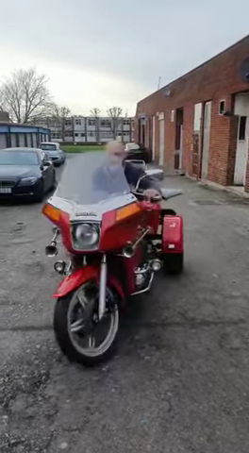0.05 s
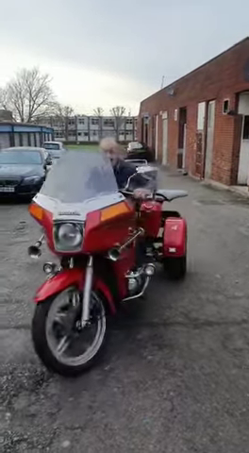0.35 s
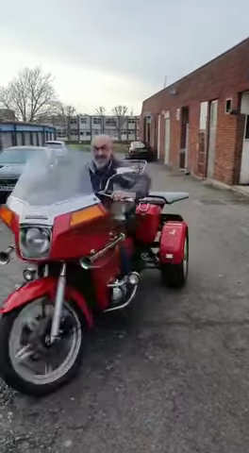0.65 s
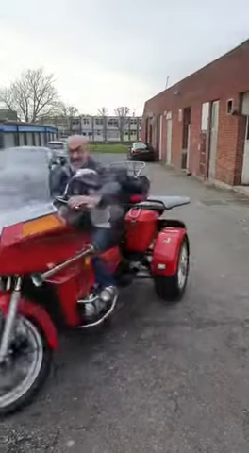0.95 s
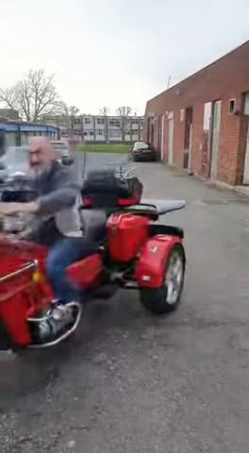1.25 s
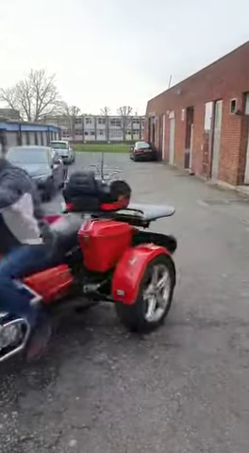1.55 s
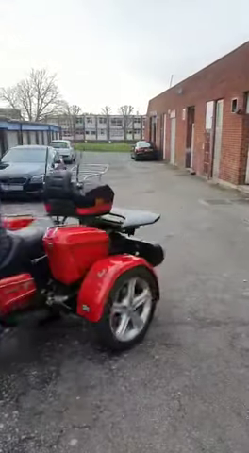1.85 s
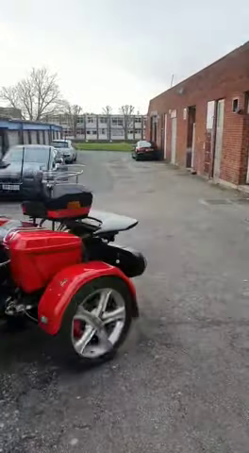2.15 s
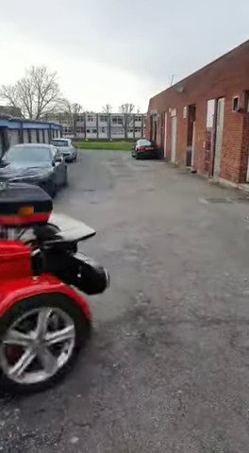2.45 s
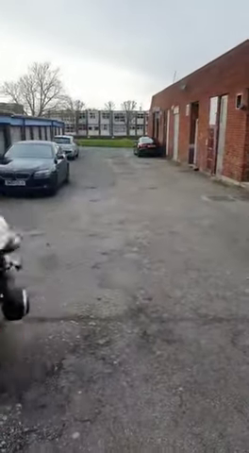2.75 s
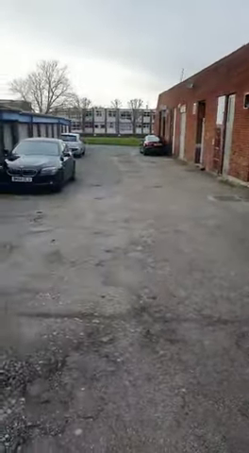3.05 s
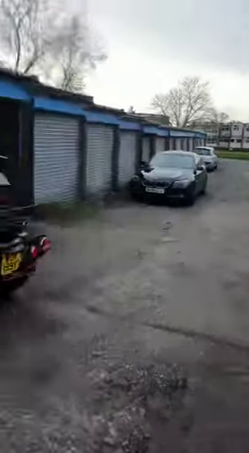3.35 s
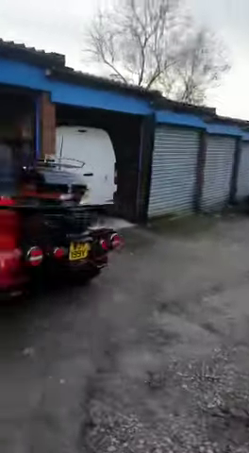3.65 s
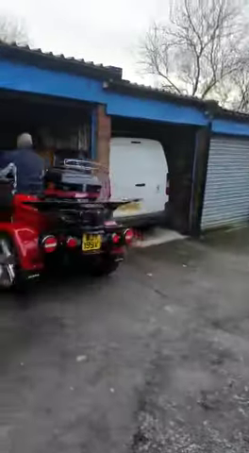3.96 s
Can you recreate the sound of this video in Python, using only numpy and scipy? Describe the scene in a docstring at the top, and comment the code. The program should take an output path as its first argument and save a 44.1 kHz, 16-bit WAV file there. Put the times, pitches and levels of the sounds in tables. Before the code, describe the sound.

A motor trike's engine rumbles close by from the start, with exhaust thump, light hiss and valve ticking. It eases off as the horn toots briefly at about 0.65 seconds and slightly longer at 1.3, echoing off the yard's walls. After two small ticks, the engine pulls again near 1.9 seconds, drops to a loping idle around 3 and rises slightly near 4. Grit crackles faintly under the tyres.

```python
"""A motor trike's four-cylinder engine, close to a stereo microphone in an asphalt yard with brick walls.
Rolling past, it pulls, eases off while the horn toots twice, pulls again and drops to a loping idle.
Each firing thumps through the exhaust and spits a puff of hiss as the valves tick. The horn is a
diaphragm buzzing into a flare. Grit crackles under the tyres; the walls echo over faint outdoor air."""
import sys
import numpy as np
from scipy import signal
from scipy.fft import rfft, irfft
from scipy.io import wavfile
from scipy.ndimage import uniform_filter1d

SR = 44100
rng = np.random.default_rng(int(sys.argv[2]) if len(sys.argv) > 2 else 0)


def output_pcm(signal):
    """Save a mono or channel-first signal as 16-bit PCM at the path in sys.argv[1].

    Samples are clipped to [-1, 1] before scaling.
    """
    pcm = np.clip(np.atleast_2d(signal).T, -1, 1) * 32767
    wavfile.write(sys.argv[1], SR, np.round(pcm).astype(np.int16))


N = 176400
T = np.arange(N) / SR

# Engine speed. Each row: time in seconds, firings per second.
SPEED = [(0, 90.6), (.17, 92.4), (.3, 73), (.6, 72), (.72, 82), (.8, 75), (.98, 58.6), (1.45, 54.2),
         (1.98, 52), (2.09, 66.9), (2.33, 66.5), (2.53, 62.3), (2.75, 64.6), (2.84, 54), (2.92, 47),
         (3.0, 42), (3.09, 27.5), (3.15, 26), (3.28, 27.8), (3.62, 27.7), (3.82, 36), (4, 44)]
# The engine's treble at the microphone. Each row: time in seconds, clatter in dB, hiss in dB.
TREBLE = [(0, -36, -46.5), (.3, -38, -45), (.62, -36.5, -40.5), (.8, -40, -54.5), (1.0, -48.5, -46.5),
          (1.28, -42.5, -47), (1.55, -46, -50), (1.85, -62, -53.5), (1.87, -35, -39.5), (2.0, -35.5, -37.5),
          (2.3, -39.5, -40), (2.8, -39, -42.5), (3.0, -41, -47), (3.2, -42, -51), (3.36, -41.5, -48.5),
          (3.6, -42.5, -50), (4, -41.5, -47.5)]
IDLE_HZ, PULL_HZ = 27.1, 62.5   # firing rates
HISS_LIKENESS = 0.0509   # left and right are nearly unrelated


def crank():
    """The turning crank, as a running count of firings; the first cylinder fires at zero."""
    count = np.cumsum(curve(SPEED)) / SR
    zero_s = 3.334
    return count - np.interp(zero_s, T, count)


def firings():
    """Two strong cylinders fire, then two weak: impulses for the thumps, hiss puffs and valve ticks."""
    # Cylinders in firing order. Each row: relative thump in dB, its delay in seconds, relative hiss in dB.
    cylinders = [(1.5, 0, 10.5), (0.16, .0007, 6.5), (-1.5, .0003, 1.5), (-2, -.0006, 2.5)]
    count = crank()
    index = np.arange(np.ceil(count[0]), count[-1]).astype(int)
    times = np.interp(index, count, T)
    thump_db, delay, hiss_db = np.array(cylinders)[index % len(cylinders)].T
    rate = np.interp(times, T, curve(SPEED))
    lope = np.interp(rate, [IDLE_HZ, PULL_HZ], [2.02, 1])   # firings are more uneven at idle
    late, loud, spit, snap = rng.standard_normal((1024, 4))[index].T
    jitter_s = .00016 * lope ** 2 * late
    thumps = clicks(times + delay + jitter_s, from_db(lope * (thump_db + loud)))
    spits = clicks(times, from_db(np.sqrt(lope) * hiss_db + 1.8 * spit))
    taps = clicks(times, from_db(hiss_db + 3 * snap) / lope ** 2)
    return thumps, spits, taps


def exhaust(thumps):
    """Firings ring the pipes; turbulent puffs roughen the bark, most of all at idle."""
    # Pipe resonances in three ranges. Each row: frequency in Hz, width in Hz, relative gain in dB.
    bass_modes = [(63.8, 34.7, 1.5), (95.9, 24, 7.5), (121.7, 29.3, -4.5)]
    middle_modes = [(159.9, 18, -3.5), (180.2, 28.3, -2.5), (202, 29, -0.5), (242, 43.3, -9.5)]
    bark_modes = [(300, 46.5, -3.5), (396, 62.4, 2), (454.5, 81.5, 0.5), (503.2, 49.4, 0),
                  (573.6, 52, -6.5)]
    # The same ranges at the microphone. Each row: time in seconds, level in dB.
    bass_levels = [(0, -14.5), (.17, -14.5), (.3, -15), (.6, -16.5), (.67, -21.5), (.8, -21.5),
                   (.98, -22.5), (1.45, -25.5), (1.619, -29), (1.86, -30.5), (2.0, -21), (2.5, -22.5),
                   (2.8, -17.5), (2.97, -22), (3.099, -19), (3.135, -27), (3.2, -21), (3.4, -19),
                   (3.65, -20), (4, -17)]
    middle_levels = [(0, -14), (.16, -16), (.3, -28), (.62, -21), (.75, -34.5), (1.3, -31), (1.8, -44.5),
                     (2.019, -23.5), (2.5, -27.5), (2.8, -25), (3.2, -37), (3.7, -38), (4, -23.5)]
    bark_levels = [(0, -27.5), (.62, -26.5), (0.899, -38.5), (1.299, -36), (1.84, -54), (1.88, -36),
                   (2.05, -29.5), (2.5, -30.5), (2.649, -26), (2.8, -22.5), (2.88, -31.5), (3.15, -40.5),
                   (3.7, -40.5), (4, -34.5)]
    roughness = np.interp(curve(SPEED), [IDLE_HZ, PULL_HZ], [2.5, 1])
    puffs = run_in(roughness * rms_one(die_away(thumps, seconds=0.034) * rng.standard_normal(N)))
    beats = run_in(rms_one(thumps))
    bass = butter(butter(pipe(beats + 0.25 * puffs, bass_modes), 28.0, "high"), 165, "low")
    middle = butter(pipe(beats + 0.59 * puffs, middle_modes), [130, 300], "band")
    bark = butter(pipe(beats + 0.8 * puffs, bark_modes), [270, 640], "band")
    bass = even(bass[-N:]) * from_db(curve(bass_levels))
    middle = even(middle[-N:]) * from_db(curve(middle_levels))
    bark = even(bark[-N:]) * from_db(curve(bark_levels))
    return bass + (middle + bark) * from_db([[-.5], [.5]])   # a touch to the right


def engine_hum():
    """At times single engine orders stand out as a hum, pulling or easing off."""
    # Hum tones. Each row: start and end in seconds, multiple of the firing rate, level in dB.
    tones = [(-.1, 0.21, 2.25, -24), (0.298, 0.63, 2, -23.5), (0.99, 1.476, 2, -25), (1.01, 1.3, 3, -32.5),
             (1.5, 1.96, 2, -43), (1.962, 2.056, 2, -24), (2.03, 2.808, 3, -34), (2.09, 2.837, 6.25, -36),
             (2.844, 3.04, 1, -22), (3.79, 4.099, 1, -26.5)]
    count, out, fade_s = crank(), 0, 0.061
    for start, end, multiple, db in tones:
        gate = np.clip(np.minimum(T - start, end - T) / fade_s + .5, 0, 1)
        out = out + from_db(db) * gate * np.sqrt(2) * np.cos(2 * np.pi * multiple * count)
    return out


def clatter_and_hiss(spits):
    """Mechanical noise and gas hiss swell from a steady floor with each firing."""
    # Colours of the two noises. Each row: frequency in Hz, relative level in dB.
    clatter_spectrum = [(380, -24), (650, -3.5), (711, -4.5), (1030, -4.5), (1150, -11.5), (2510, -11),
                        (3470, -17), (4500, -20), (5850, -21.5), (9900, -120)]
    hiss_spectrum = [(2060, -23), (3500, -19.5), (4140, 0.5), (5280, -7), (6170, 3), (8110, -8.5),
                     (11400, -4.5), (15000, -9)]
    puff_s, swell_s = 0.014, 0.01
    puff = rms_one(die_away(die_away(spits, puff_s), swell_s))
    clatter = even(0.55 + 0.48 * puff) * noise(clatter_spectrum, likeness=0.21)
    hiss = 0.93 * even(0.3 + 0.88 * puff) * noise(hiss_spectrum, HISS_LIKENESS)
    return clatter * from_db(curve(TREBLE)) + hiss * from_db(curve(TREBLE, column=2))


def valves(taps):
    """The valve gear gives one short, bright tick with each firing, following the level of the hiss."""
    # Colour of a tick. Each row: frequency in Hz, relative level in dB.
    tick_spectrum = [(2500, -26), (6200, 1.5), (8300, -12.5), (11500, -3), (15000, -6)]
    ticks = die_away(taps, seconds=0.0021) * noise(tick_spectrum, HISS_LIKENESS)
    return from_db(2 + curve(TREBLE, column=2)) * ticks


def horn():
    """A buzzing diaphragm starts sharp and settles; upper partials flutter, the flare holds the lowest."""
    # Toots. Each row: start and length in seconds, gain in dB, starting and settled pitch in Hz,
    # settling time in seconds, leftward pan in dB, left lag in seconds, the fundamental's rise
    # and ring in seconds, relative rasp in dB.
    toots = [(.648, 0.072, -11, 319.3, 306, 0.0538, 0, .00005, 0.053, 0.03, -13),
             (1.284, 0.162, -12, 321.3, 304.4, 0.0153, 0.5, -.0002, 0.014, 0.0056, -23.5)]
    # Harmonics, lowest first. Each row: relative dB head-on (first toot) and side-on (second toot).
    partials = [(9.5, 5.5), (5.5, 4.5), (-4.5, 0), (-9, -8.5), (-3.5, -2.5), (-10, -2.5), (-8.5, -2.5),
                (-12, -15), (-15, -15.5), (-9.5, -15), (-20.5, -17), (-22.5, -24)]
    # Drop in dB for each harmonic beyond those: head-on, side-on.
    fall_db = [1.26, 1.5]
    # Flare resonances that colour the rasp. Each row: frequency in Hz, width in Hz, relative gain in dB.
    flare_modes = [(950, 31, 10), (1600, 210, -5.5), (2350, 420, 1)]
    # Balance at the microphone. Each row: frequency in Hz, left minus right in dB.
    balance = [(300, -2), (600, 1.5), (900, -3), (1600, -7.5), (2200, -11), (2800, -0.5), (7000, -13.5)]
    attack_s, treble_lag_s, rasp_attack_s, release_s = 0.0041, 0.00095, 0.014, 0.011
    jitter, dispersion, flutter_hz = 0.0039, .23, 54
    multiples = np.arange(1, 24)
    listed = np.minimum(multiples, len(partials))
    out, left_right = np.zeros((2, N)), np.array([[.5], [-.5]])
    for i, toot in enumerate(toots):
        start, length, db, start_hz, end_hz, settle_s, pan_db, lag_s, bass_rise_s, ring_s, rasp_db = toot
        on = (T >= start) & (T < start + length + .2)
        age = T[on] - start
        after = np.maximum(age - length, 0)
        waver = rms_one(butter(rng.standard_normal(N), 120, "low"))[on]
        rasp = rms_one(butter(pipe(rng.standard_normal((2, N)), flare_modes), 3760, "low"))[:, on]
        hz = end_hz + (start_hz - end_hz) * np.exp(-(age / settle_s) ** 2 / 2)
        phase = 2 * np.pi * np.cumsum(hz * (1 + jitter * waver)) / SR
        flutters = rms_one(butter(rng.standard_normal((len(multiples), SR)), flutter_hz, "low"))
        gains = from_db(np.array(partials)[listed - 1, i] - fall_db[i] * (multiples - listed))
        gains *= from_db(db) * np.sqrt(2 / np.sum(gains ** 2))
        kick = from_db(7.5 * np.exp(-(age / 0.071) ** 2))   # the upper partials start louder
        slam = from_db(5.5 * np.exp(-(age / 0.016) ** 2))   # the diaphragm's first swings overshoot
        for k, gain, flutter in zip(multiples, gains, flutters[:, -len(age):]):
            rise_s = bass_rise_s if k == 1 else attack_s + treble_lag_s * k
            envelope = (1 - np.exp(-(age / rise_s) ** 2)) * np.exp(-after / (release_s + ring_s / k ** 3))
            envelope *= kick if k > 2 else slam
            envelope *= 1 + min(0.044 * k, .5) * flutter
            sides = from_db((pan_db + at_hz(balance, k * end_hz)) * left_right)
            lag = 2 * np.pi * k * end_hz * lag_s * left_right / (1 + (k / 10) ** 2)
            angle = 2 * np.pi * end_hz * age if k == 1 else k * phase - dispersion * k ** 2
            out[:, on] += gain * envelope * sides / sides.mean() * np.cos(angle - lag)
        gate = (1 - np.exp(-age / rasp_attack_s)) * np.exp(-after / release_s)
        out[:, on] += from_db(db + rasp_db) * gate * kick * (1 + np.cos(phase)) * rasp
    return out


def tyres():
    """Grit cracks at random under the tyres."""
    grains_per_s, spread_db = 120, 7
    grains = (rng.random(N) < grains_per_s / SR) * from_db(spread_db * np.minimum(rng.exponential(1, N), 3.5))
    cracks = die_away(grains, seconds=0.0016) * rng.standard_normal((2, N))
    grit = rms_one(butter(cracks, [2000, 13000], "band"))
    nearness = rms_one(from_db(curve(TREBLE, column=2)))   # follows the engine's hiss
    return from_db(-54) * nearness * grit


def sharp_ticks():
    """Two sharp ticks, the second as the engine picks up again."""
    # Ticks. Each row: time in seconds, gain in dB.
    ticks = [(1.681, -30.5), (1.865, -30)]
    times, db = np.transpose(ticks)
    bursts = die_away(clicks(times, from_db(db)), seconds=0.011) * rng.standard_normal((2, N))
    return butter(bursts, [500, 7000], "band")


def yard(x):
    """Echoes from the brick walls, duller with distance, and a thin diffuse tail."""
    # Walls, nearest first. Each row: delay in seconds, left and right gain in dB, treble cut in Hz.
    echoes = [(0.02, -15, -13.5, 5200), (0.031, -17, -11.5, 5200), (.058, -13.5, -17, 2500),
              (0.099, -19, -22, 1600), (.2, -26, -30, 900)]
    t, t60_s = T[:SR], 1
    tail = butter(rng.standard_normal((2, SR)), 1480, "low") * from_db(-60 * t / t60_s) * (t > .008)
    response = from_db(-16) * tail / np.sqrt(np.sum(from_db(-120 * t / t60_s)))
    for delay, left_db, right_db, cut_hz in echoes:
        echo = butter(signal.unit_impulse(SR, int(delay * SR)), cut_hz, "low")
        response += from_db([[left_db], [right_db]]) * echo
    return signal.fftconvolve(x, response, axes=1)[:, :N]


def outdoor_air():
    """A faint, steady rumble, much alike on both sides of the microphone."""
    # Colour of the air. Each row: frequency in Hz, relative level in dB.
    air_spectrum = [(25, -13), (60, 1), (200, -9.5), (600, -23.5), (2000, -29), (8000, -42.5), (16000, -68)]
    return from_db(-39.5) * noise(air_spectrum, likeness=0.84)


def from_db(db):
    """Decibels to gain."""
    return 10 ** (np.asarray(db) / 20)


def rms_one(x):
    """Scale to unit rms."""
    return x / np.sqrt(np.mean(x ** 2) + 1e-20)


def curve(rows, column=1):
    """One column of a table, joined by straight lines in time."""
    rows = np.array(rows)
    return np.interp(T, rows[:, 0], rows[:, column])


def at_hz(points, hz):
    """Read a spectrum on a log-frequency axis."""
    points = np.array(points)
    return np.interp(np.log(hz + 1e-9), np.log(points[:, 0]), points[:, 1])


def butter(x, hz, kind):
    """Second-order Butterworth filter."""
    return signal.sosfilt(signal.butter(2, hz, kind, fs=SR, output="sos"), x + 1e-18)


def noise(spectrum, likeness):
    """Stereo noise of a given colour and left-right likeness; rms 1."""
    mid, side = rng.standard_normal((2, N))
    both = np.sqrt(1 + likeness) * mid + np.sqrt(1 - likeness) * side * [[1], [-1]]
    colour = from_db(at_hz(spectrum, np.arange(N // 2 + 1) * SR / N))
    return rms_one(irfft(rfft(both) * colour, N))


def clicks(times, gains):
    """Impulses at the given times."""
    out, inside = np.zeros(N), (times >= 0) & (times < T[-1])
    np.add.at(out, (times[inside] * SR).astype(int), gains[inside])
    return out


def die_away(x, seconds):
    """Give each impulse an exponential tail."""
    return signal.lfilter([1], [1, -np.exp(-1 / (seconds * SR))], x + 1e-18)


def even(x):
    """Hold the rms near 1 over the length of an idling engine cycle."""
    cycle = int(4 * SR / IDLE_HZ)
    return x / np.sqrt(uniform_filter1d(x ** 2, cycle, mode="reflect") + 1e-14)


def pipe(x, modes):
    """Parallel resonances with alternating signs."""
    out = 0
    for k, (hz, width, db) in enumerate(modes):
        r = np.exp(-np.pi * width / SR)
        feedback = [1, -2 * r * np.cos(2 * np.pi * hz / SR), r * r]
        out = out + (-1) ** k * from_db(db) * signal.lfilter([1 - r, 0, r - 1], feedback, x + 1e-18)
    return out


def run_in(x):
    """Prepend four engine cycles so that the pipes already ring."""
    cycle = int(4 * SR / SPEED[0][1])
    return np.concatenate([np.tile(x[:cycle], 4), x])


def lag_left(x, seconds):
    """Let the sound reach the left of the microphone later."""
    return np.array([np.interp(T - seconds, T, x[0]), x[1]])


def scene():
    """Engine, horn and tyres at close range, with the yard's echoes and the air behind them."""
    thumps, spits, taps = firings()
    low_end = lag_left(exhaust(thumps) + engine_hum(), seconds=0.00013)
    engine = low_end + clatter_and_hiss(spits) + valves(taps)
    toots = horn()
    return engine + toots + tyres() + sharp_ticks() + yard(toots + from_db(-6.0) * engine) + outdoor_air()


def record(dry):
    """The recorder rounds the highest peaks and cuts the top."""
    rounded = dry / (1 + np.abs(dry) ** 6) ** (1 / 6)
    stop_hz = 16500
    return signal.sosfilt(signal.cheby2(12, 70, stop_hz, fs=SR, output="sos"), rounded)


dry = scene()
out = record(dry)
output_pcm(out)
```